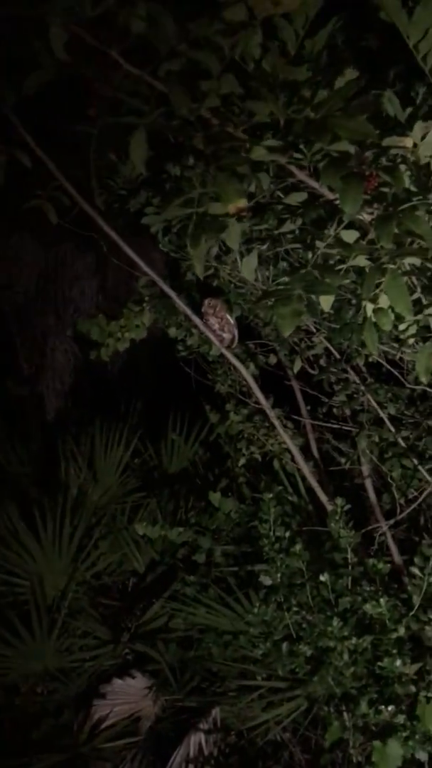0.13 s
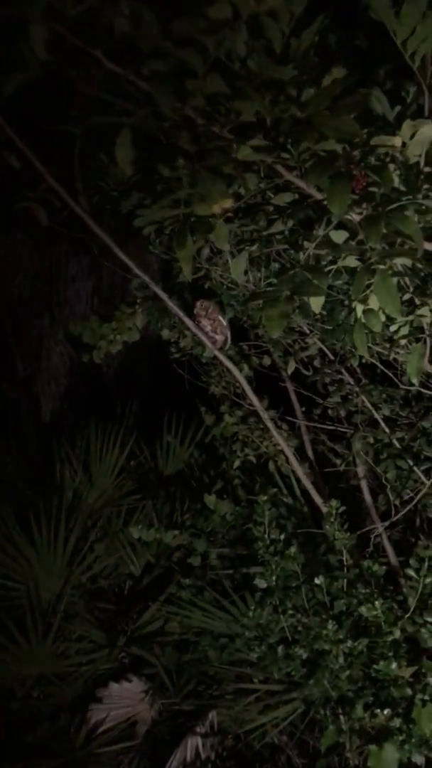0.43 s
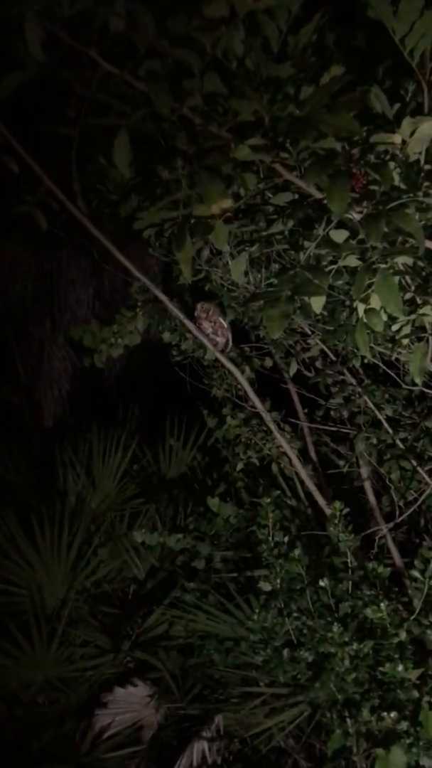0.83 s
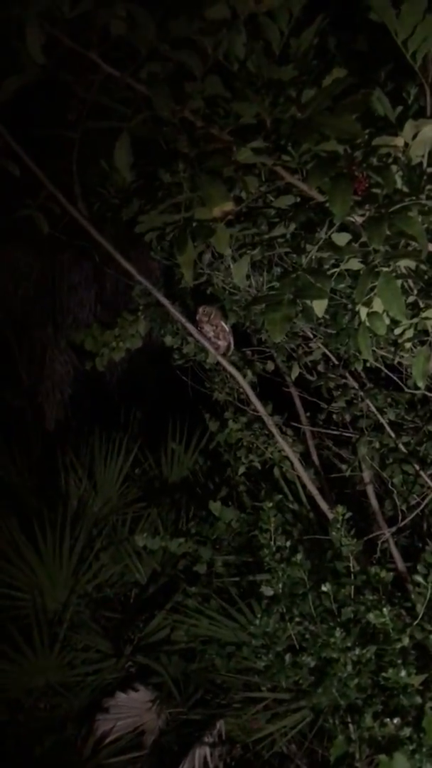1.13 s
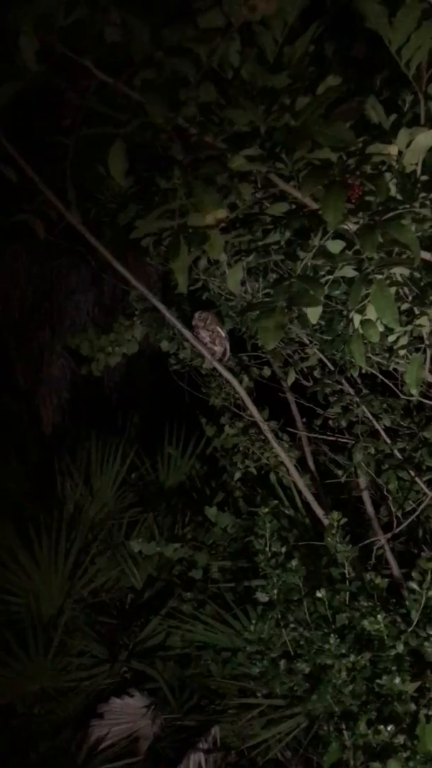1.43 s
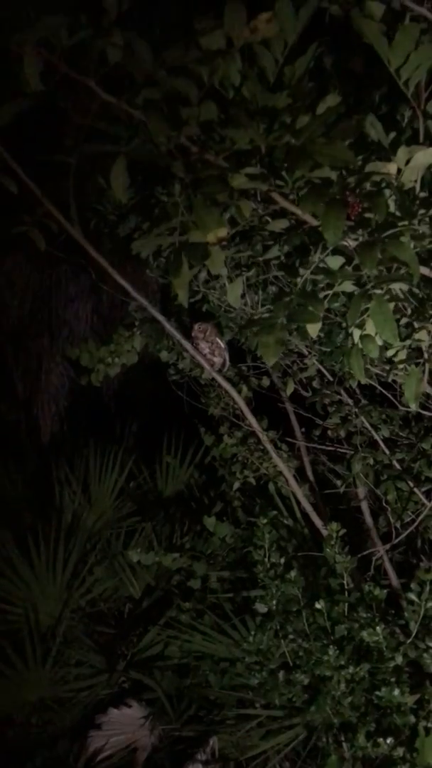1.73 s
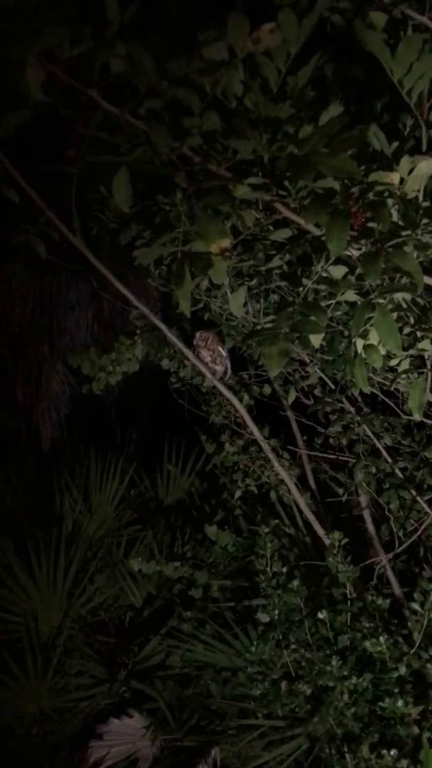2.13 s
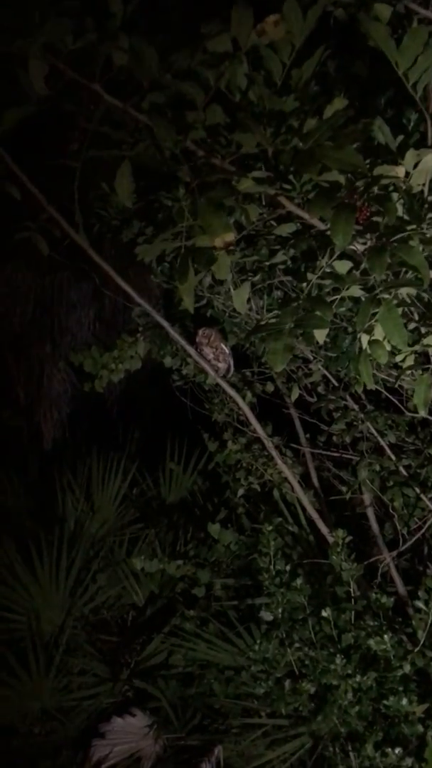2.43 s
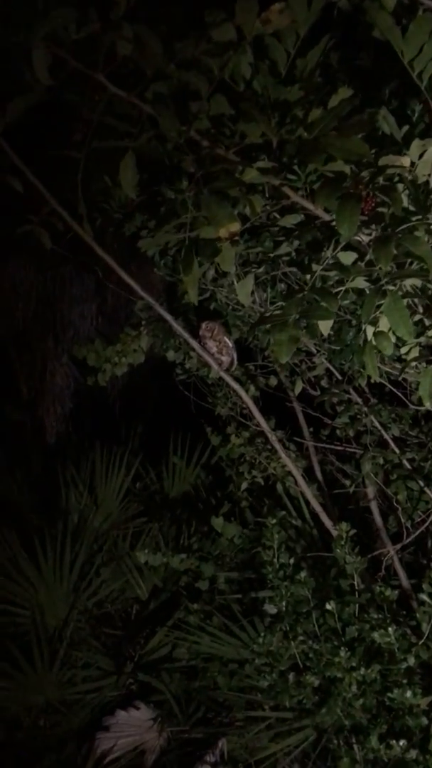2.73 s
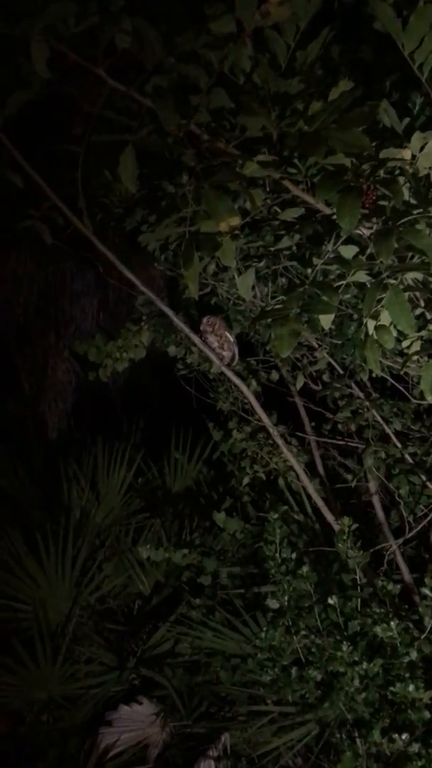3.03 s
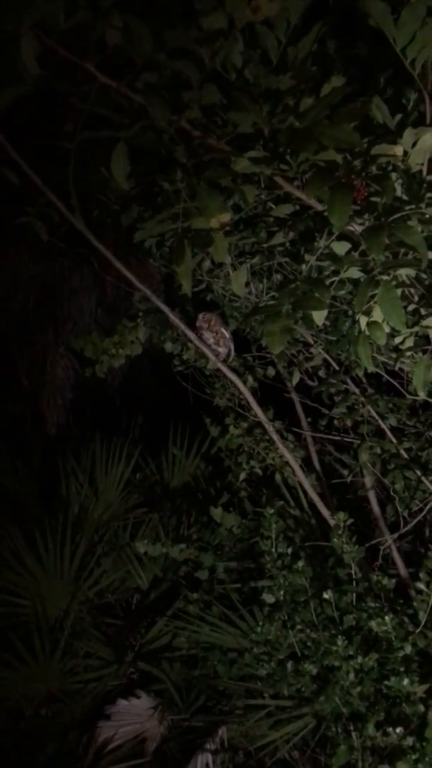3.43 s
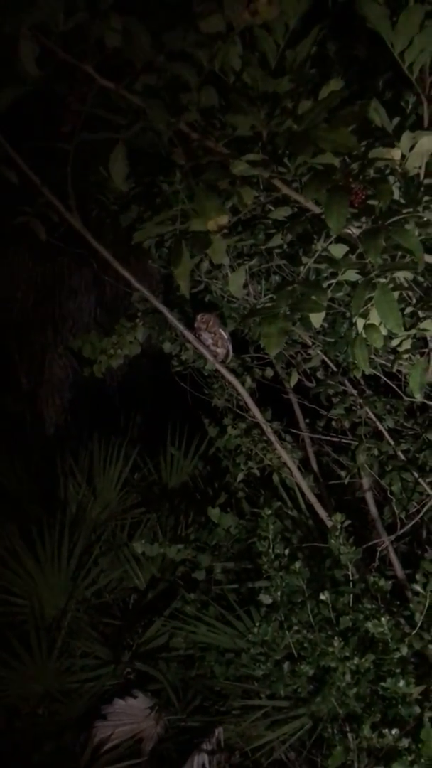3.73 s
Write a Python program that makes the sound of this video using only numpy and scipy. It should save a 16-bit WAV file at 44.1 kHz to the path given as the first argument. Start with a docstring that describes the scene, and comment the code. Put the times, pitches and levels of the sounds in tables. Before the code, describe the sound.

One descending owl trill, close and nearly dry, then only crickets chirping in twos and threes, a distant bird's quick whistles midway, and faint low hum and hiss; quiet outdoor night, microphone some metres away.

```python
"""Garden at night: a small owl gives one falling trill, notes cut from one gliding reed-like tone.
A near cricket chirps in twos and threes, a toothed file exciting a ringing wing.
Farther crickets are short rising tone strokes over a blurred wash; distant nightjar whistles are glides.
A machine hums in steady lines with a thin whine, under soft shaped-noise hiss."""
import sys
import numpy as np
from scipy import signal
from scipy.fft import rfft, irfft
from scipy.io import wavfile

SR = 44100
rng = np.random.default_rng(int(sys.argv[2]) if len(sys.argv) > 2 else 0)


def makeup_ratio(level_db):
    """Linear amplitude ratio for a level in decibels (20 dB per factor of ten)."""
    decades = np.asarray(level_db, float) / 20
    return 10 ** decades


def unload_audio(sound):
    """Save the sound as a 16-bit wav file, at the path given as the first command line argument."""
    columns = np.transpose(np.atleast_2d(sound))
    # keep every value between -1 and 1, then stretch to whole-number steps
    steps = np.round(np.clip(columns, -1, 1) * 32767)
    wavfile.write(sys.argv[1], SR, steps.astype(np.int16))


N = 170667  # samples

# machine hum lines: pitch_hz, level_db (rms), waver_db
HUM_LINES = [(38.4, -69, 1), (56.74, -64, 2), (75.87, -61, 0.5), (118.6, -69.5, 0), (189.2, -76, 2),
             (304.8, -70.5, -1.5)]
WHINE_HZ, WHINE_DB, WHINE_WAVER_DB = 11391, -94, 2.0
# night hiss and rumble spectrum: freq_hz, relative_density_db (per Hz)
HISS_SPECTRUM = [(15, -55), (25, -10.5), (65, -2.5), (146, -12.5), (182, -17.5), (273, -18), (305, -17.5),
                 (426, -23.5), (1630, -29.5), (2980, -38), (5200, -39.5), (6760, -47), (11400, -120)]
HISS_DB = -59
# high hiss spectrum: freq_hz, relative_density_db (per Hz)
AIR_SPECTRUM = [(3500, -59), (5000, -5.5), (5600, 7.5), (6600, -5), (7200, -7), (9800, -7), (10500, -13.5),
                (11300, -7.5), (14500, -12), (15600, -4)]
AIR_DB = -75
# blurred cricket chorus bands: centre_hz, width_hz, level_db (rms)
CHORUS_BANDS = [(5780, 86, -80.5), (6050, 110, -75.5), (6292, 400, -78), (6364, 140, -77),
                (3063, 17, -101.5), (11850, 180, -93.5)]

# nightjar whistles, one list per glide: time_s, pitch_hz, level_db
NIGHTJAR_GLIDES = [
    [(1.97, 2240, -68), (1.982, 1850, -66), (2.003, 1470, -74)],
    [(2.23, 1100, -78), (2.285, 1370, -71), (2.297, 1630, -63), (2.312, 2230, -62.5), (2.33, 1800, -69)],
    [(2.352, 1350, -68), (2.365, 1680, -59), (2.38, 1650, -68), (2.40, 1685, -58), (2.437, 1650, -61),
     (2.458, 1350, -74)],
    [(2.61, 1320, -68), (2.63, 1480, -64), (2.646, 1530, -60), (2.671, 2235, -61), (2.682, 1880, -63),
     (2.70, 1810, -68)],
    [(2.696, 1440, -63), (2.709, 1620, -61), (2.718, 1960, -64), (2.728, 1700, -65), (2.74, 1450, -65),
     (2.77, 1330, -70), (2.805, 1083, -75)],
]
NIGHTJAR_WET_DB, NIGHTJAR_FLUTTER_DB = -5, 2.5

# farther crickets, per singer: pitch_hz, strokes (middle_s, level_db)
FAR_SINGERS = [ (6225, [(.128, -55.5), (.188, -59), (.245, -56.5), (.495, -55), (.545, -52), (.6, -57.5),
               (.866, -53), (.936, -58), (.98, -69), (1.21, -60), (1.283, -52.5), (1.34, -58.5),
               (1.555, -57.5), (1.637, -59), (1.697, -57), (1.895, -60), (1.956, -61), (2.0, -57),
               (2.057, -56.5), (2.275, -58), (2.34, -59.5), (2.425, -58.5), (2.615, -57.5), (2.668, -60.5),
               (2.838, -56), (2.898, -54), (3.114, -59), (3.168, -58.5), (3.198, -56), (3.443, -66),
               (3.505, -60.5), (3.575, -59), (3.815, -59.5)]), (6320, [(.195, -53), (.253, -56), (.5, -57),
               (.57, -61), (.865, -64), (.922, -51), (1.205, -63.5), (1.275, -64), (1.59, -64),
               (2.54, -56.5), (2.6, -56), (2.87, -61), (2.93, -60), (3.228, -56.5), (3.297, -55),
               (3.616, -55), (3.675, -61)]), (6440, [(0.697, -68), (0.752, -63.5), (1.074, -64),
               (1.455, -65), (1.51, -68), (2.146, -68), (2.548, -65), (2.895, -68), (3.455, -61),
               (3.508, -65), (3.806, -74), (3.863, -67)])]
FAR_RISE_HZ_PER_S, FAR_SPREAD_HZ, FAR_STROKE_S = 2110, 14.7, 0.014

# near cricket wing strokes: middle_s, level_db (before file and ring gains)
NEAR_STROKES = [(.522, -46), (.582, -45), (0.9, -44), (0.961, -44), (1.257, -44.5), (1.316, -43),
                (1.601, -44.5), (1.66, -44), (1.718, -44.5), (2.026, -45), (2.0865, -45), (2.147, -46),
                (2.465, -45), (2.525, -44.5), (2.857, -46.5), (2.917, -45.5), (2.977, -45), (3.272, -46),
                (3.331, -44.5), (3.391, -46.5), (3.675, -44), (3.735, -45)]
# one stroke of the file over the wing: offset_s (from middle), tooth_rate_hz, relative_db
FILE_STROKE = [(-.018, 5877, -0.5), (-.013, 5916, -6.5), (-.010, 6062, -19), (-.006, 6032, -7),
               (.004, 5969, -4), (.007, 5839, -8), (.011, 5890, 1), (0.017, 5684, -5.5), (0.021, 5600, -20)]
WING_HZ, WING_WIDTH_HZ, WING_RING_DB, FILE_DB = 6014, 57, 7, -3.5
OCTAVE_HZ, OCTAVE_S, OCTAVE_DB = 12006, 0.011, -20.5

# owl tone glide: time_s, pitch_hz
OWL_GLIDE = [(0.03, 586.3), (0.636, 481), (0.994, 395), (1.01, 388.4), (1.14, 370.2)]
# owl beats, a full note then a muffled one until the next beat:
# start_s, full_length_s, full_db, muffled_db, brightness_db (overtones)
OWL_NOTES = [(0.033, 0.023, -36, -38.5, -6), (0.073, 0.029, -36, -42, 0.5), (0.132, 0.027, -35, -46, 2),
             (0.2, 0.026, -38, -48, 2.5), (0.264, 0.027, -39.5, -47, 4), (0.329, 0.041, -42, -45, 0.8),
             (.396, 0.043, -43.5, -43.5, 2), (0.466, 0.04, -41.5, -43, -1.5),
             (0.536, 0.042, -41.5, -43, -2.5), (0.607, 0.046, -41, -49, -4), (0.677, .042, -41, -47.5, 0),
             (.752, .039, -42.5, -50, 0.5), (0.823, 0.045, -44, -48.5, 3), (0.896, 0.041, -46, -48.5, 6.5),
             (.968, 0.042, -46.5, -46.5, 5), (1.042, 0.044, -45, -48.5, 0.2)]
# owl overtones: multiple, relative_db (full note, time 0), change_db_per_s, muffled_change_db
OWL_PARTIALS = [(2, -21, 11, -9), (3, -31.5, -19, 4), (4, -27.5, -23, 3)]
# faint high pips at the head of some owl notes: middle_s, level_db
OWL_PIPS = [(.075, -68.5), (.133, -66), (.2, -69.5), (.4, -68.5), (.468, -65.5), (0.538, -70), (.609, -73),
            (.757, -73.5), (.826, -72), (.897, -75), (.968, -73), (1.043, -76)]
PIP_HZ, PIP_SPREAD_HZ, PIP_S = 3146, 25, 0.0073
OWL_END_S, OWL_OVERLAP_S, OWL_SAG_HZ = 1.15, 0.006, 29
OWL_FIRST_RISE_S, OWL_RISE_S, OWL_RELEASE_S, OWL_LAST_RELEASE_S = 0.016, 0.010, 0.011, 0.058
SLIP_TURNS, SLIP_SPREAD_TURNS, FUSED_S, FUSING_S = 0.42, 0.057, 0.97, 0.14
FULL_FADE_DB, MUFFLED_FADE_DB, MUFFLED_FADE_LOSS_DB_PER_S = 4.5, 11, 5
OVERTONE_DB, OVERTONE_FADE_DB, OVERTONE_FADE_GAIN_DB_PER_S = 0.5, 14, 3
BREATH_HZ, BREATH_WIDTH_HZ, BREATH_DB, BREATH_LOSS_DB_PER_S = 900, 520, -24, 23
CATCH_HZ, CATCH_FALL_HZ_PER_S, CATCH_S, CATCH_DELAY_S = 750, 20000, 0.0035, 0.002
CATCH_DB, CATCH_LOSS_DB_PER_S, CATCH_SPREAD_DB = -13, 8, 2

GARDEN_T60_S, GARDEN_ECHO_S, FIELD_T60_S, FIELD_ECHO_S = 0.42, 0.015, 0.8, 0.075
OWL_WET_DB, CRICKET_WET_DB, FAR_WET_DB = -23, -14.5, -5


def tick():
    """Clock in seconds."""
    return np.arange(N) / SR


def rms_one(x):
    """Scale to rms 1."""
    return x / np.sqrt(np.mean(x ** 2) + 1e-20)


def drift(rate_hz):
    """Slow random wander of spread 1: noise through two equal poles, run at SR / 40."""
    r = np.exp(-80 * np.pi * rate_hz / SR)
    noise = rng.standard_normal(N // 40 + 2002)
    slow = signal.lfilter([1], [1, -2 * r, r * r], noise)[2000:]
    return np.interp(np.arange(N) / 40, np.arange(len(slow)), rms_one(slow - slow.mean()))


def gate(t, start_s, end_s, rise_s, fall_s):
    """Smooth rise after start, smooth fall before end."""
    ramp = np.minimum((t - start_s) / rise_s, (end_s - t) / fall_s)
    return np.sin(np.pi / 2 * np.clip(ramp, 0, 1)) ** 2


def resonance(x, hz, width_hz):
    """One resonance, gain 1 on top."""
    r = np.exp(-np.pi * width_hz / SR)
    zeros = [(1 - r * r) / 2, 0, (r * r - 1) / 2]
    return signal.lfilter(zeros, [1, -2 * r * np.cos(2 * np.pi * hz / SR), r * r], x)


def band_noise(n, hz, width_hz):
    """Noise through the same resonance twice, rms 1."""
    once = resonance(rng.standard_normal(n), hz, width_hz)
    return rms_one(resonance(once, hz, width_hz))


def coloured(spectrum):
    """Noise with the given spectrum, rms 1."""
    hz, db = np.transpose(spectrum)
    bins_hz = np.maximum(np.arange(N // 2 + 1) * SR / N, 1)
    shape = makeup_ratio(np.interp(np.log(bins_hz), np.log(hz), db))
    shape = shape * (bins_hz > hz[0]) * (bins_hz < hz[-1])
    return rms_one(irfft(rfft(rng.standard_normal(N)) * shape, N))


def scattered_return(x, t60_s, first_s):
    """Scatter from leaves and walls: convolution with noise that dies away."""
    t = tick()[:SR]
    tail = rng.standard_normal(SR) * makeup_ratio(-60 * t / t60_s) * (t > first_s)
    return signal.fftconvolve(x, tail / np.sqrt(np.sum(tail ** 2)))[:N]


def hiss():
    """Broadband noise of wavering level plus steady high noise."""
    low = makeup_ratio(HISS_DB + 0.84 * drift(1.7)) * coloured(HISS_SPECTRUM)
    return low + makeup_ratio(AIR_DB) * coloured(AIR_SPECTRUM)


def machine_hum():
    """Sines of fixed pitch whose levels may waver, and one thin high whine."""
    out = np.zeros(N)
    for hz, db, waver_db in HUM_LINES + [(WHINE_HZ, WHINE_DB, WHINE_WAVER_DB)]:
        level = np.sqrt(2) * makeup_ratio(db + waver_db * drift(2.9))
        out += level * np.sin(2 * np.pi * (hz * tick() + rng.random()))
    return out


def cricket_wash():
    """Still farther crickets blurred into narrow noise bands of wavering level."""
    return sum(makeup_ratio(db + 2.2 * drift(12.0)) * band_noise(N, hz, width_hz)
               for hz, width_hz, db in CHORUS_BANDS)


def nightjar():
    """Gliding whistles with wavering pitch, fluttering in level on their long way."""
    t, out, waver_hz = tick(), np.zeros(N), 13 * drift(45)
    for rows in NIGHTJAR_GLIDES:
        s, hz, db = np.transpose(rows)
        level = makeup_ratio(np.interp(t, s, db)) * gate(t, s[0], s[-1], 0.004, 0.0029)
        turns = np.cumsum(np.interp(t, s, hz) + waver_hz) / SR
        out += level * np.sin(2 * np.pi * turns)
    return out * makeup_ratio(NIGHTJAR_FLUTTER_DB * drift(85))


def far_crickets():
    """Short bell-shaped strokes of rising pitch from three singers."""
    u, out = tick()[:int(0.08 * SR)] - 0.04, np.zeros(N + SR)
    for hz, strokes in FAR_SINGERS:
        for middle_s, db in strokes:
            i = int((middle_s - 0.04) * SR)
            pitch_hz = hz + FAR_SPREAD_HZ * rng.standard_normal() + FAR_RISE_HZ_PER_S * u
            tone = np.sin(2 * np.pi * np.cumsum(pitch_hz) / SR)
            out[i:i + len(u)] += makeup_ratio(db) * np.exp(-(u / FAR_STROKE_S) ** 2) * tone
    return out[:N]


def near_cricket():
    """File teeth drive the wing at a changing rate; the wing rings on and beats against them."""
    at_s, rate_hz, level_db = np.transpose(FILE_STROKE)
    u = tick()[:int(0.06 * SR)] - 0.03
    file, octave = np.zeros(N), np.zeros(N)
    swell = makeup_ratio(np.interp(u, at_s, level_db)) * gate(u, at_s[0], at_s[-1], 0.0027, 0.0018)
    grain = makeup_ratio(1.7 * drift(110))  # uneven teeth
    for middle_s, db in NEAR_STROKES:
        luck = rng.standard_normal()
        i = int((middle_s - 0.03) * SR)
        now = slice(i, i + len(u))
        turns = np.cumsum(np.interp(u, at_s, rate_hz) + 4.2 * luck) / SR
        file[now] += makeup_ratio(db) * swell * grain[now] * np.sin(2 * np.pi * turns)
        bell = np.exp(-(u / OCTAVE_S) ** 2)
        tone = np.sin(2 * np.pi * (OCTAVE_HZ + 15 * luck) * u)
        octave[now] += makeup_ratio(db + OCTAVE_DB) * bell * grain[now] * tone
    ring = resonance(file, WING_HZ, WING_WIDTH_HZ)
    return makeup_ratio(FILE_DB) * file + makeup_ratio(WING_RING_DB) * ring + octave


def owl_catch(u, db):
    """Brief falling tone, a catch between full and muffled note."""
    turns = (CATCH_HZ - CATCH_FALL_HZ_PER_S * u / 2) * u
    return makeup_ratio(db) * np.exp(-(u / CATCH_S) ** 2) * np.sin(2 * np.pi * turns)


def owl_pips(t):
    """Faint high tone bursts with bell-shaped envelopes."""
    out = np.zeros(len(t))
    for middle_s, db in OWL_PIPS:
        u = t - middle_s
        hz = PIP_HZ + PIP_SPREAD_HZ * rng.standard_normal()
        out += makeup_ratio(db) * np.exp(-(u / PIP_S) ** 2) * np.sin(2 * np.pi * hz * u)
    return out


def owl():
    """One reed-like tone cut into sagging notes; overtones fade within a note, breath over the trill."""
    t, out = tick()[:int(1.3 * SR)], np.zeros(N)
    glide_turns = np.cumsum(np.interp(t, *np.transpose(OWL_GLIDE))) / SR
    breath = band_noise(len(t), BREATH_HZ, BREATH_WIDTH_HZ)
    slip_turns = 0
    ends_s = [row[0] for row in OWL_NOTES[1:]] + [OWL_END_S]
    for (s, length_s, full_db, muffled_db, bright_db), end_s in zip(OWL_NOTES, ends_s):
        luck = rng.standard_normal(2)
        apart = np.clip((FUSED_S - s) / FUSING_S, 0, 1)  # notes fuse near the end
        split_s = s + length_s
        muffled_fade_db = max(MUFFLED_FADE_DB - MUFFLED_FADE_LOSS_DB_PER_S * s, 0)
        notes = ((s, split_s, full_db, FULL_FADE_DB, 0),
                 (split_s, end_s, muffled_db, muffled_fade_db, 1))
        for start_s, stop_s, db, fade_db, muffled in notes:
            now = slice(int((start_s - 0.01) * SR), int((stop_s + 0.01) * SR))
            u = t[now]
            done = (u - start_s) / (stop_s - start_s)
            # muffled notes start out of step until fused
            slip_turns += apart * (muffled * SLIP_TURNS + SLIP_SPREAD_TURNS * luck[muffled])
            sag_turns = OWL_SAG_HZ * (stop_s - start_s) * done * (1 - done) / 2
            phase = 2 * np.pi * (glide_turns[now] + sag_turns + slip_turns)
            tops = sum(makeup_ratio(a_db + b_db * s + muffled * c_db) * np.sin(round(k) * phase)
                       for k, a_db, b_db, c_db in OWL_PARTIALS)
            tops_fade_db = (OVERTONE_FADE_DB + OVERTONE_FADE_GAIN_DB_PER_S * s) * done ** 2
            tops = tops * makeup_ratio(bright_db + OVERTONE_DB - tops_fade_db)
            air = makeup_ratio(BREATH_DB - BREATH_LOSS_DB_PER_S * s) * breath[now]
            rise_s = OWL_FIRST_RISE_S if start_s == OWL_NOTES[0][0] else OWL_RISE_S
            release_s = OWL_LAST_RELEASE_S if stop_s == OWL_END_S else OWL_RELEASE_S
            shape = gate(u, start_s - OWL_OVERLAP_S, stop_s + OWL_OVERLAP_S, rise_s, release_s)
            level = makeup_ratio(db - apart * fade_db * done ** 2)
            out[now] += level * shape * (np.sin(phase) + tops + air)
        catch_db = full_db + CATCH_DB - CATCH_LOSS_DB_PER_S * s + CATCH_SPREAD_DB * luck[1]
        out[:len(t)] += owl_catch(t - split_s - CATCH_DELAY_S, catch_db)
    out[:len(t)] += owl_pips(t)
    return out


def scene():
    """Near voices almost dry, far ones wet, over hum and hiss."""
    floor = hiss() + machine_hum() + cricket_wash()
    bird, chirps, cricket, trill = nightjar(), far_crickets(), near_cricket(), owl()
    sends = makeup_ratio(OWL_WET_DB) * trill + makeup_ratio(CRICKET_WET_DB) * cricket + makeup_ratio(FAR_WET_DB) * chirps
    wet = scattered_return(sends, GARDEN_T60_S, GARDEN_ECHO_S)
    wet = wet + makeup_ratio(NIGHTJAR_WET_DB) * scattered_return(bird, FIELD_T60_S, FIELD_ECHO_S)
    return (trill + cricket + chirps + bird + wet + floor)[None]


def roll_off(x):
    """The treble ends steeply here."""
    return signal.sosfilt(signal.butter(12, 15690, fs=SR, output="sos"), x)


def record(dry):
    """The microphone drops the deepest bass: third-order high-pass at 32 Hz."""
    bass_cut = signal.butter(3, 32, "high", fs=SR, output="sos")
    mix = signal.sosfilt(bass_cut, dry)
    return roll_off(mix)


dry = scene()
out = record(dry)
unload_audio(out)
```